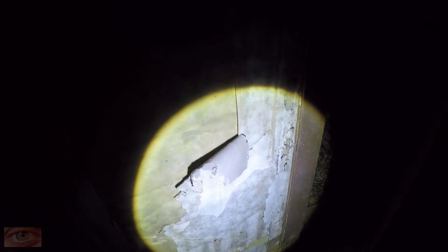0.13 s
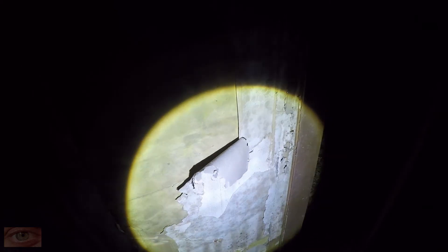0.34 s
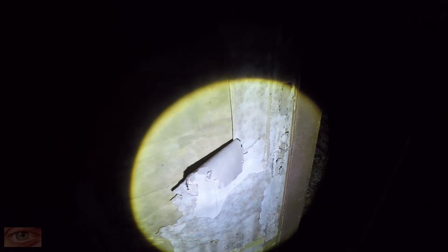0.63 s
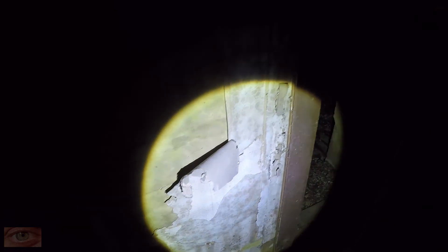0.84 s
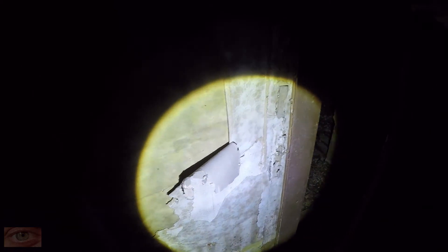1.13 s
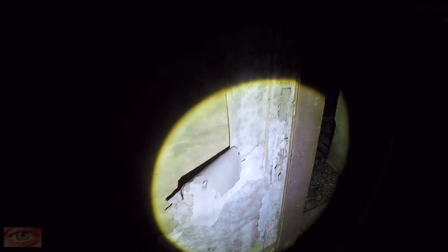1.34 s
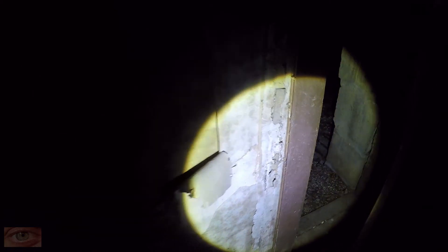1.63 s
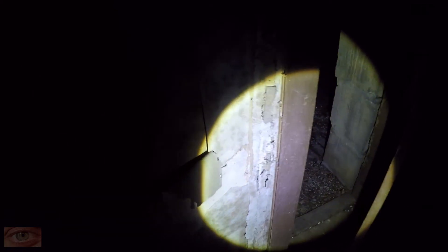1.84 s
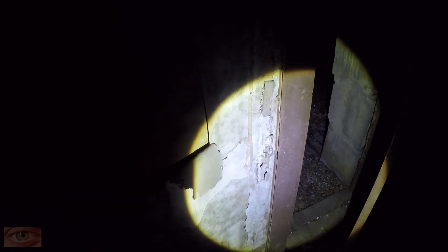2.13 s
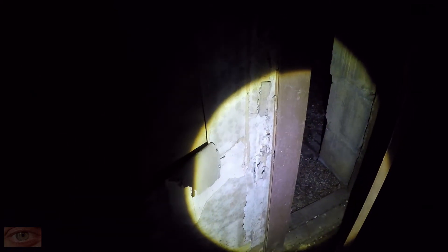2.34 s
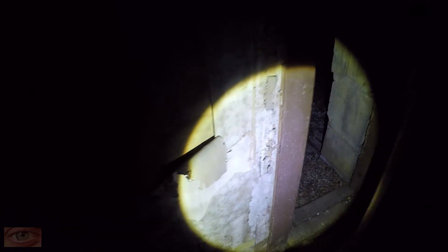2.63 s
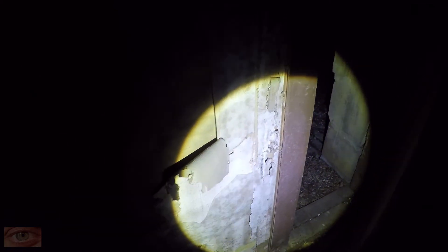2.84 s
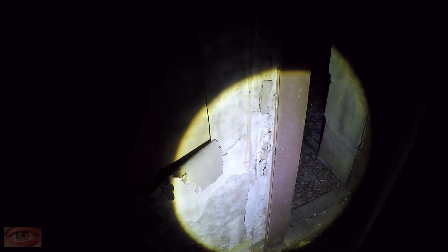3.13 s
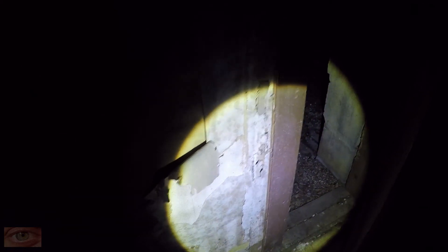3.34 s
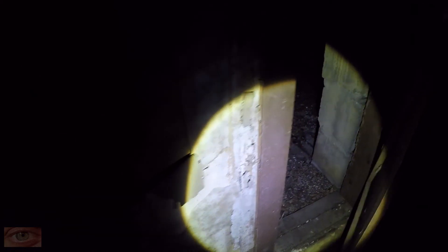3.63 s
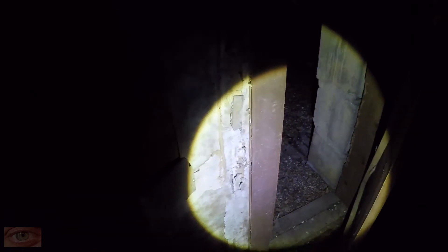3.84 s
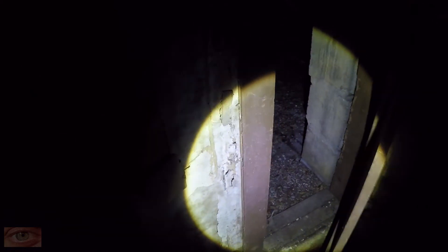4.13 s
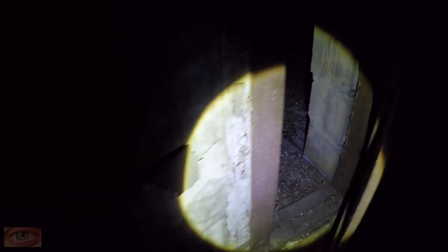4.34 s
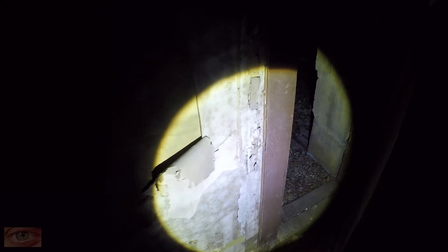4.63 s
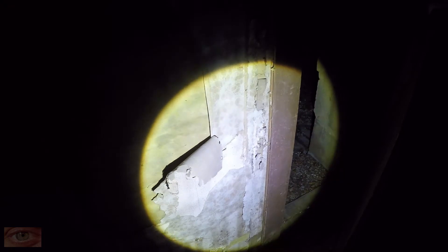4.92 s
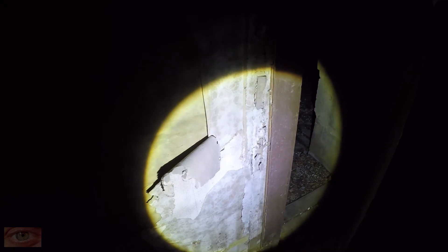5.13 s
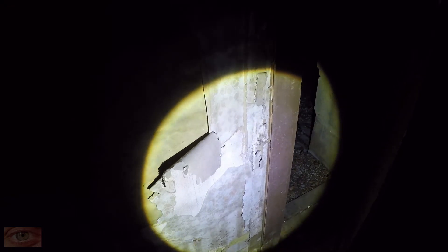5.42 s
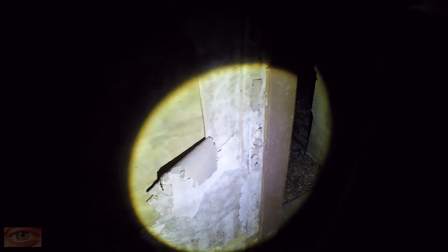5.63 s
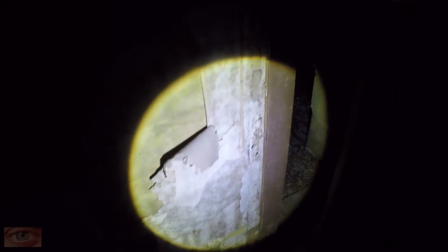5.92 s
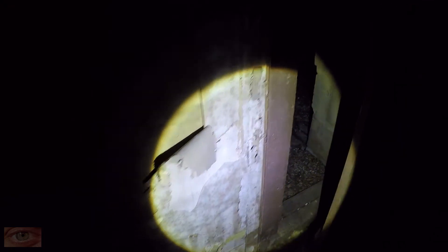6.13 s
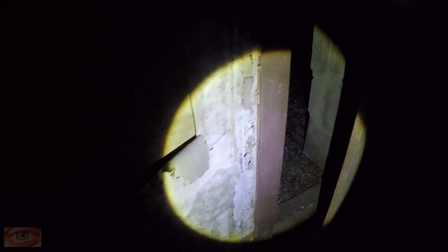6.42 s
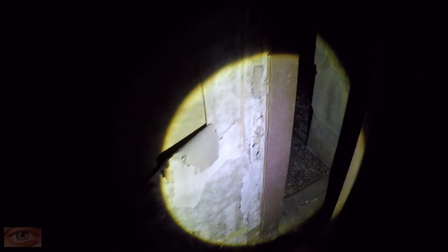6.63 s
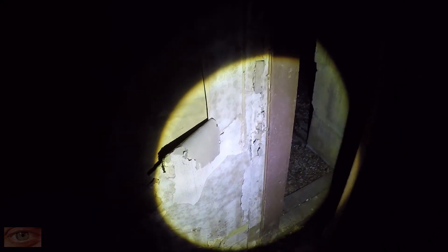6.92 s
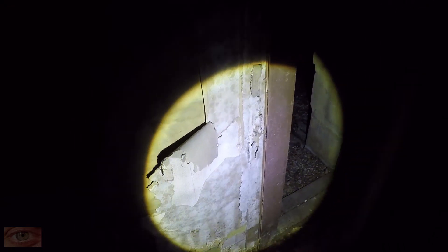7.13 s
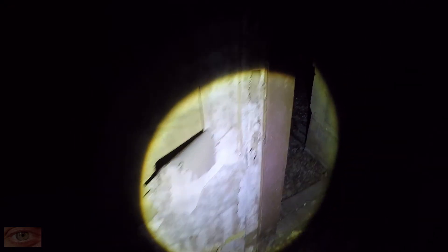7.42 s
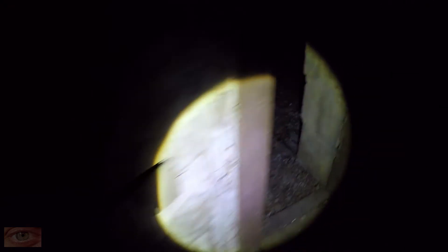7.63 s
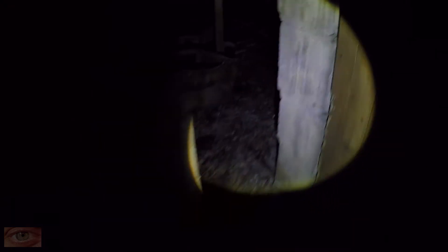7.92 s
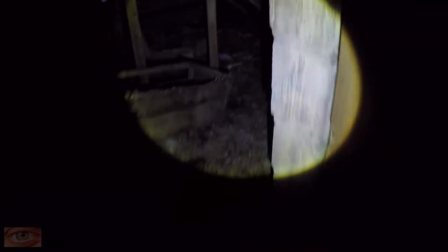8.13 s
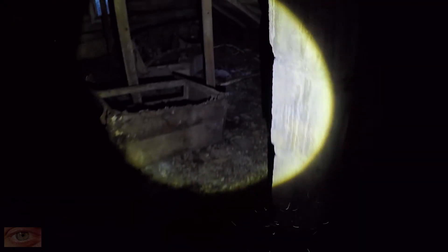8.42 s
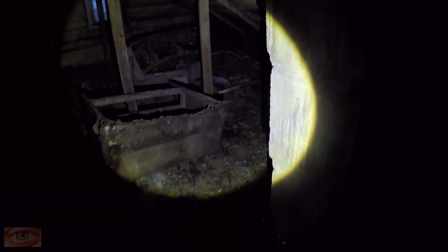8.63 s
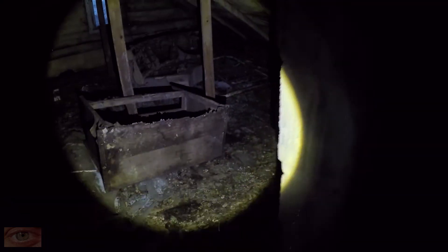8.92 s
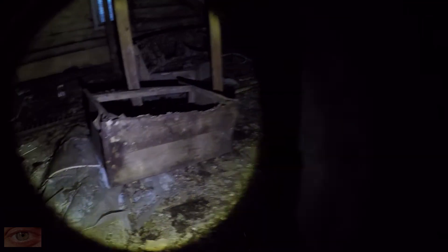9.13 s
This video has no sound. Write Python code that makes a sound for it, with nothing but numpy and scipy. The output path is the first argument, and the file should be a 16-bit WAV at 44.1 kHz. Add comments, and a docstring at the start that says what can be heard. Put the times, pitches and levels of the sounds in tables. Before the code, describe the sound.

In an empty house, a stuck wooden door is forced with repeated shoves and kicks. Each blow thumps low while the wood knocks against the frame, the loose handle rattles and the latch clinks. Between blows the bottom edge scrapes over gritty boards. The door breaks free near the end and a few fading footsteps follow. The close hand-held microphone picks up some low rumble and a short room echo.

```python
"""Forcing a swollen door

An empty house, a hand-held microphone close to a wooden door that is shoved, kicked and dragged open.
Each shove thumps the leaf and the floor, wood chatters against the frame, the loose latch clinks and the
bottom edge scrapes over grit. The door breaks free near the end and a few steps follow on the boards."""
import sys
import numpy as np
from scipy import signal
from scipy.fft import rfft, irfft
from scipy.io import wavfile
from scipy.ndimage import uniform_filter1d

SR = 44100
rng = np.random.default_rng(int(sys.argv[2]) if len(sys.argv) > 2 else 0)


def store_pcm(level_fs):
    """Save levels as 16-bit WAV."""
    pcm = np.round(np.clip(level_fs, -1, 1) * 32767).astype(np.int16)
    wavfile.write(sys.argv[1], SR, np.atleast_2d(pcm).T)


N = 409228
TIME = np.arange(N) / SR

# heavy blows on leaf and floor: (time [s], level [dB], pitch of the flexing wood [Hz])
HEAVY_BLOWS = [(0.48, -11, 166), (0.512, -5, 39), (.907, -9, 130), (1.001, -6, 101.4), (1.488, -10.5, 73),
               (2.351, -10, 85), (2.399, -11, 64.3), (2.436, -9, 94), (2.798, -6.5, 96.5), (2.85, -11, 68),
               (3.842, -27, 130), (3.899, -20, 67), (4.561, -2, 65.5), (4.95, -15, 96), (5.245, -3, 71),
               (5.46, -11.5, 80), (5.521, -10, 71.4), (5.649, -15, 76), (5.936, -18, 85.5),
               (6.272, -19, 172), (6.284, -15, 80), (6.462, -24, 73), (6.586, -4, 68), (6.62, -4, 37.7),
               (6.735, -7, 31.2), (7.805, -7, 88), (7.923, -11.5, 53), (8.232, -32, 48), (8.675, -30, 75),
               (9.213, -30, 51)]
# low resonances of door leaf and floorboards: (frequency [Hz], width [Hz], gain [dB])
LEAF_MODES = [(34.5, 3, 2.5), (61, 10, -6), (82.5, 9, -11), (104, 16, -7), (141, 24, -3), (185, 40, -3)]


def undb(db):
    """Decibels to gain."""
    return 10 ** (np.asarray(db) / 20)


def unit(x):
    """Scale to rms 1."""
    return x / np.sqrt(np.mean(x ** 2))


def add(track, start_s, sound):
    """Mix a sound into the track at start_s."""
    i = max(int(start_s * SR), 0)
    track[i:i + len(sound)] += sound[:N - i]


def fade(t, t60):
    """Gain of a ring that loses 60 dB in t60 seconds."""
    return np.exp(-np.log(1000) * t / t60)


def colour(x, spectrum, size=4096):
    """Causal filter through (Hz, dB) points, from the cepstrum of the log gain."""
    hz, db = np.transpose(spectrum)
    grid_hz = np.maximum(np.arange(size // 2 + 1) * SR / size, 1)
    gain = undb(np.interp(np.log(grid_hz), np.log(hz), db))
    cepstrum = irfft(np.log(gain))
    cepstrum[1:size // 2] *= 2
    cepstrum[size // 2 + 1:] = 0
    response = irfft(np.exp(rfft(cepstrum)))
    return signal.fftconvolve(x, response)[:len(x)]


def resonate(x, modes):
    """Sum of resonances given as (frequency [Hz], width [Hz], gain [dB])."""
    return sum(undb(db) * signal.lfilter(*signal.iirpeak(hz, hz / width, fs=SR), x)
               for hz, width, db in modes)


def wander(rate_hz):
    """Smooth random drift with a spread near 1."""
    hold = int(SR / rate_hz)
    return uniform_filter1d(rng.standard_normal(N)[np.arange(N) // hold], hold)


def contacts(spread_db):
    """Dense tiny impacts of very unequal size."""
    noise, size = rng.standard_normal((2, N))
    return unit(noise * undb(spread_db * size))


def efforts(gestures, attack_s, t60):
    """Gain of overlapping (start [s], end [s], level [dB]) gestures: each rises, holds and dies away."""
    power = 1e-18
    for start, end, db in gestures:
        rise = 1 - np.exp(-np.maximum(TIME - start, 0) / attack_s)
        release = fade(np.maximum(TIME - end, 0), t60)
        power = power + (undb(db) * rise * release) ** 2
    return np.sqrt(power)


def strike(hits, modes, push_s):
    """An object rings; where it is hit decides which modes answer, and a longer push softens the start."""
    out, t = np.zeros(N), TIME[:SR // 2]
    hz, mode_db, t60 = np.transpose(modes)
    envelopes = (1 - np.exp(-t / push_s)) * fade(t, t60[:, None])
    for start, db, centre_hz, spread_oct in hits:
        phase = rng.random((len(hz), 1))
        share = undb(mode_db) * np.exp(-.5 * (np.log2(hz / centre_hz) / spread_oct) ** 2) + 1e-18
        rings = envelopes * np.sin(2 * np.pi * (hz[:, None] * t + phase))
        add(out, start, undb(db) * (share / np.linalg.norm(share)) @ rings)
    return out


def house_hiss(level_db=-54):
    """The faint, nearly steady tone of the empty house."""
    # room tone: (frequency [Hz], level [dB])
    spectrum = [(59, -39), (100, 1.5), (218, -12), (438, -9.5), (564, -12.5), (843, -11), (977, -13.5),
                (1230, -13.5), (1520, -16), (5510, -25), (13900, -37.5), (15500, -38)]
    hiss = unit(colour(rng.standard_normal(N), spectrum))
    return hiss * undb(level_db + .27 * wander(rate_hz=13))


def microphone_rumble(still_db=-38.5):
    """Air and handling rumble on the microphone, swelling as the door swings."""
    # rumble: (frequency [Hz], level [dB])
    spectrum = [(8, -5.5), (20, 15), (34, 18), (48, 9.5), (70, 2.5), (140, -56)]
    # swells of air and handling: (start [s], end [s], level [dB])
    sways = [(.5, .78, -27), (1.0, 1.6, -27), (1.9, 2.0, -36), (2.4, 2.48, -13), (2.7, 3.95, -32),
             (4.55, 4.75, -17.5), (5.22, 5.3, -16), (5.51, 5.79, -20.5), (5.9, 6.15, -31),
             (6.59, 6.82, -23.5), (7.86, 7.98, -31.5)]
    rumble = unit(colour(rng.standard_normal(N), spectrum, size=16384))
    steady = rumble / np.sqrt(uniform_filter1d(rumble ** 2, size=6000))
    return steady * np.hypot(efforts(sways, attack_s=.017, t60=1), undb(still_db))


def room_echoes(x, build_s=.0046):
    """Diffuse echoes from bare walls, strongest in the lows."""
    # reverberation of the bare rooms: (low edge [Hz], high edge [Hz], t60 [s], level [dB])
    bands = [(50.4, 166, 0.56, -5), (207, 494, 0.3, -7), (755, 2200, 0.55, -26), (3000, 5000, 0.31, -52.5)]
    t, response = TIME[:SR], 0
    for low, high, t60, db in bands:
        bandpass = signal.butter(2, [low, high], "band", fs=SR, output="sos")
        noise = signal.sosfilt(bandpass, rng.standard_normal(SR))
        envelope = (1 - np.exp(-t / build_s)) * fade(t, t60)
        response = response + undb(db) * noise * envelope / np.linalg.norm(envelope)
    return signal.fftconvolve(x, response)[:N]


def footsteps():
    """Weight lands on a loose floorboard and sets it ringing."""
    # footfalls: (time [s], level [dB], centre of the excited modes [Hz], spread [octaves])
    footfalls = [(7.808, -13.5, 243, 0.56), (7.925, -22.5, 260, 0.5), (8.237, -18, 230, 1.24),
                 (8.675, -31, 223, 0.91), (8.712, -38, 250, 1.5), (9.060, -37.5, 119, 1.6),
                 (9.215, -31.5, 130, 0.67)]
    # loose floorboard: (frequency [Hz], level [dB], t60 [s])
    board_modes = [(61.4, 10.5, .8), (171, -4.5, .28), (249, -5, .26), (327, -3, .14), (398, -6, .2),
                   (650, 0, .1)]
    return strike(footfalls, board_modes, push_s=.00084)


def chips(start_s=2.58, end_s=2.97, loudest_db=-38, t60=.06, count=90):
    """Brittle chips shaken loose by the hardest shove crunch and tinkle, each at its own pitch."""
    out, t = np.zeros(N), TIME[:SR // 5]
    for when, pitch, size in rng.random((count, 3)):
        ping = np.sin(2 * np.pi * (4500 + 10000 * pitch) * t) * fade(t, t60)
        swell = np.sin(np.pi * when)  # the shower builds and thins out
        add(out, start_s + when * (end_s - start_s), swell * undb(loudest_db + 15 * (size - 1)) * ping)
    return out


def latch():
    """The loose iron latch clinks in short, high rings."""
    # clinks: (time [s], level [dB], centre of the excited modes [Hz], spread [octaves])
    clinks = [(1.006, -29, 7240, .046), (2.652, -33, 14300, 0.016), (2.658, -30, 6080, 0.067),
              (2.778, -21, 10700, .12), (2.806, -20, 13100, .02), (2.848, -7.5, 7000, 1.1),
              (2.965, -40, 4500, 0.63), (3.062, -39, 6980, 0.085), (5.628, -37, 6900, .1),
              (7.834, -32, 13100, 0.022), (8.194, -39, 3500, .3)]
    # iron latch: (frequency [Hz], level [dB], t60 [s])
    latch_modes = [(2875, -15, .17), (3246, -17, .16), (4011, -17, .08), (4635, -16, .12), (5453, 0, .11),
                   (5560, -9, .04), (5658, -13, .05), (6207, -20, .16), (6783, -1, .1), (7165, -26, .2),
                   (7730, -21, .09), (8510, -7, .07), (10309, -18, .1), (10730, -21, .14),
                   (11850, -17, .13), (13130, -20, .11), (13662, -1, .1), (13900, -19, .14),
                   (14900, -12, .07)]
    return strike(clinks, latch_modes, push_s=.00089)


def handle(spread_oct=.4):
    """Jolts rattle the loose handle."""
    # jolts: (time [s], level [dB], centre of the excited modes [Hz])
    jolts = [(1.003, -8, 3700), (2.396, -20, 2250), (3.092, -32.5, 3200), (4.272, -25, 2970),
             (4.3, -33, 2690), (4.57, -25, 1500), (4.738, -35.5, 1300), (4.941, -25, 1700),
             (4.957, -24, 3000), (5.053, -30.5, 1350), (5.25, -26.5, 1700), (5.305, -29.5, 2570),
             (5.454, -25.5, 1600), (5.523, -22, 3000), (5.626, -26, 2720), (6.29, -25.5, 4150),
             (6.692, -32.5, 1750), (7.888, -21, 1900), (7.968, -28, 2430)]
    # loose handle: (frequency [Hz], level [dB], t60 [s])
    handle_modes = [(1210, -3, 0.11), (1323, 1.5, 0.16), (1560, -13.5, .12), (1796, -14.5, 0.056),
                    (1785, -3, 0.086), (2120, -3, 0.14), (2344, -5, 0.12), (2630, -20.5, 0.073),
                    (2695, -8.5, .14), (2992, -2.5, 0.055), (3190, 0, 0.11), (3620, -1.5, 0.071),
                    (3860, -6.5, 0.082), (4340, -5, 0.1), (6850, -9, 0.14)]
    return strike([(*jolt, spread_oct) for jolt in jolts], handle_modes, push_s=.00034)


def scrape(rubbing, crushing):
    """The bottom edge catches and slips over the boards, crushing fine grit."""
    # wood rubbing on wood: (frequency [Hz], level [dB])
    rub_spectrum = [(150, -48), (250, -13.5), (312, -2), (523, -2), (561, -2.5), (853, -3.5), (1240, -4.5),
                    (1910, -7), (4300, -11), (7000, -26), (9100, -32.5), (15400, -120)]
    # grit under the edge: (frequency [Hz], level [dB])
    grit_spectrum = [(3000, -7), (5500, 4), (7500, -2.5), (10000, -6), (14000, -6), (15500, -17.5)]
    slips = undb(2.4 * wander(rate_hz=31) + 2.6 * wander(rate_hz=140))
    rub = unit(colour(contacts(spread_db=4.6) * slips, rub_spectrum)) * rubbing
    grit = unit(colour(contacts(spread_db=3.5) * slips, grit_spectrum)) * crushing
    return undb(-.3) * rub + undb(2) * grit


def catches(rubbing, count=60, above_rub_db=1, scatter_db=2.5, t60=.06):
    """Rows of small knocks: the edge catches at random, about as hard as it is rubbing just then."""
    rows = []
    for when, size, hardness in rng.random((count, 3)):
        db = 20 * np.log10(rubbing[int(when * N)]) + above_rub_db + scatter_db * (2 * size - 1)
        tilt, body_db = 4 * (2 * hardness - 1), db - 2
        rows.append((when * N / SR, db, tilt, body_db, t60))
    return rows


def shudder(rubbing, rub_gain_db=3, blow_gain_db=-23):
    """Friction keeps the whole leaf trembling, and it trembles on after each heavy blow."""
    # low drag on the leaf: (frequency [Hz], level [dB])
    spectrum = [(35, -17), (65, 4), (110, -4), (150, -11.5), (220, -18.5), (500, -62)]
    drag = colour(rng.standard_normal(N), spectrum)
    tremble = unit(undb(-5) * drag + resonate(drag, LEAF_MODES))
    aftershock = efforts([(start, start, db) for start, db, _ in HEAVY_BLOWS], attack_s=.015, t60=.8)
    return tremble * np.hypot(undb(rub_gain_db) * rubbing, undb(blow_gain_db) * aftershock)


def panel(spread_oct=.5, drum_db=-14.5, drum_hz=180):
    """The hollow panel rings under square blows, and its lowest modes drum along with every thump."""
    # blows square on the panel: (time [s], level [dB], centre of the excited modes [Hz])
    hits = [(.483, -20, 357), (.912, -11, 150), (1.004, -21, 368), (2.437, -14, 836), (2.59, -15, 630),
            (2.803, -14, 450), (2.835, -13, 174), (4.145, -33, 200), (5.456, -22, 664), (5.545, -24.5, 400),
            (5.938, -19, 320), (6.288, -17, 350), (6.588, -17.5, 490), (7.807, -9, 228),
            (7.892, -17.5, 430)]
    # door panel: (frequency [Hz], level [dB], t60 [s])
    panel_modes = [(139.4, 5, 0.34), (170.4, -2, 0.33), (190.8, 4, 0.24), (211.6, -7, 0.11),
                   (300.1, -5.5, 0.27), (325.6, -1.5, 0.14), (415.8, -6, 0.17), (441.4, -6.5, 0.15),
                   (526, -8.5, 0.16), (565, -2.5, 0.11), (644, -5.5, 0.3), (787, -4, 0.26),
                   (866, 1.5, 0.14), (1110, -19.5, 0.5), (1263, 3.5, 0.26), (1490, 9.5, .2)]
    square = [(*hit, spread_oct) for hit in hits]
    drummed = [(start, db + drum_db, drum_hz, spread_oct) for start, db, _ in HEAVY_BLOWS]
    return strike(square + drummed, panel_modes, push_s=.0021)


def thumps():
    """The wood flexes for a few cycles under each blow and sets leaf and floor booming."""
    flex, t = np.zeros(N), TIME[:SR // 2]
    for start, db, hz in HEAVY_BLOWS:
        swell_s = min(.004 - .00035 * db, .008)  # weaker blows build more slowly, up to a limit
        age = t / swell_s
        add(flex, start, undb(db) * age * np.exp(1 - age) * np.sin(2 * np.pi * hz * t))
    return undb(-2.5) * flex + undb(3.5) * resonate(flex, LEAF_MODES)


def planks(contact):
    """The boards pass on each contact through a few strong resonances and a thicket of short weak ones."""
    # planks and frame: (frequency [Hz], width [Hz], gain [dB])
    plank_modes = [(331.7, 32, 5), (417, 29, -3), (566, 64, -0.5), (859, 20, -2.5), (1127, 25, -5),
                   (1345, 59, -0.5), (1545, 13, -9.5), (2170, 29, -16.5), (2317, 76, -4.5),
                   (2890, 110, -3.5), (3340, 37, -10), (3496, 34, -3.5), (4080, 130, 3.5), (4740, 130, 1)]
    t = TIME[:SR // 8]
    thicket = rng.standard_normal(len(t)) * fade(t, t60=.055)
    dense = signal.fftconvolve(contact, thicket / np.linalg.norm(thicket))[:N]
    return undb(-3) * contact + undb(-2) * resonate(contact, plank_modes) + undb(-9) * dense


def knocks(edge_catches, rise_s=.0011):
    """Rough faces meet in a dying burst of contacts: a hollow note, a clack, a crack and splintering."""
    # wood on wood, from the first shove to shoes on the boards:
    # (time [s], level [dB], hardness as treble tilt [dB/octave], hollow body [dB], chatter t60 [s])
    door_knocks = [ (.479, -21.5, 1.5, -21.5, .24), (0.903, -32, 1, -20, .11), (0.942, -30.5, 1, -24, 0.31),
                   (1.0, -6.5, 4.5, -10, 0.11), (1.392, -37, 0, -40, .2), (1.432, -27, 5, -33.5, 0.19),
                   (1.466, -25.5, 5, -31, 0.18), (1.496, -27, 0, -27.5, 0.086), (2.349, -23, -3, -21, .21),
                   (2.394, -11, -1.5, -11, 0.083), (2.434, -7, -4, -5, .105), (2.571, -28, -4, -30, .1),
                   (2.587, -35.5, -3, -28, .12), (2.613, -14, 0.5, -23, .11),
                   (2.765, -21.5, 9.5, -26, 0.21), (2.792, -14, 1, -17.5, 0.3), (2.803, -12, 12, -13, 0.13),
                   (2.825, -18, 1, -14, .12), (2.848, -10.5, 8.5, -12, 0.033), (2.884, -28, 2, -18, .15),
                   (3.019, -30, 3, -37, .1), (3.047, -19, 5, -29, 0.07), (3.196, -49.5, -14, -34, 0.085),
                   (3.731, -52, -19, -40, .3), (3.842, -41.5, -4.5, -28.5, 0.39),
                   (3.893, -25, 2.5, -33, .14), (4.142, -38.5, 0, -29.5, .16), (4.271, -31, 5, -44, .08),
                   (4.379, -32, 0.5, -44, 0.11), (4.565, -26, -1.5, -23, .17), (4.74, -41, 2, -40, .25),
                   (4.939, -27, -1.5, -31, .11), (4.953, -27, -4, -24, .12), (5.05, -30.5, 4.5, -45, 0.19),
                   (5.151, -36, 1, -45, .12), (5.214, -34, -8.5, -17.5, 0.063), (5.246, -28, -2, -22, .15),
                   (5.269, -30, 0, -34, .18), (5.366, -35, 4, -41, .09), (5.419, -35, 8, -36, .1),
                   (5.451, -19, -5, -16.5, 0.072), (5.52, -25, 3.5, -21, 0.097), (5.543, -27, 0, -26, .2),
                   (5.623, -22.5, 6.5, -36, 0.14), (5.931, -37, -5, -23, 0.15),
                   (5.964, -32, 1.5, -32.5, 0.2), (5.996, -34, -2, -42, .1), (6.272, -30.5, 2, -22, 0.11),
                   (6.288, -24, 4, -26, 0.11), (6.463, -50, -8, -28, .1), (6.546, -37, -3, -42, .18),
                   (6.584, -25, -1.5, -10.5, 0.14), (6.623, -30.5, -1, -25, 0.35),
                   (6.69, -28.5, -1, -27, .09), (6.72, -50, -6, -22, .13), (7.26, -39, -8.5, -49, .06),
                   (7.804, -26, 1, -13, .1), (7.818, -15.5, 7, -29, .1), (7.856, -20, 2, -22, 0.16),
                   (7.887, -14.5, 3, -17.5, 0.13), (7.951, -26.5, -1.5, -26, 0.14),
                   (8.049, -45, -5, -37, .08), (8.193, -43, 10, -53, .1), (8.235, -46, -8.5, -16, 0.11),
                   (8.672, -51.5, -7.5, -41.5, 0.17), (9.213, -40.5, -7, -59, 0.06)]
    # the five voices of a knock, low to high, each (frequency [Hz], level [dB])
    body_spectrum = [(90, -44.5), (190, 1), (300, -3), (450, -2.5), (650, -3), (850, -16.5), (1300, -38.5),
                     (3000, -73.5)]
    clack_spectrum = [(350, -43.5), (700, -4.5), (950, -2.5), (1500, -4.5), (1900, -6), (2800, -38.5)]
    crack_spectrum = [(1000, -61.5), (1700, 6.5), (2100, 9), (3400, 7), (4500, -10.5), (6000, -8),
                      (11000, -43)]
    splinter_spectrum = [(2500, -18), (4300, 6), (5200, 5), (6500, -3), (8000, -7), (11000, -23),
                         (15000, -36)]
    snap_spectrum = [(5000, -45), (8000, 4.5), (11000, 3.5), (15000, -7)]
    starts, crack_db, tilt, body_db, t60s = np.transpose(door_knocks + edge_catches)
    clack_db, splinter_db = crack_db - tilt, crack_db + tilt  # an octave below and above the crack
    snap_db = 1.51 * splinter_db  # only the hardest blows snap fibres and reach the top octave
    voices = [(body_spectrum, body_db - 6), (clack_spectrum, clack_db - 2.7),
              (crack_spectrum, crack_db - 4), (splinter_spectrum, splinter_db - 14),
              (snap_spectrum, snap_db - 20)]
    out, t = np.zeros(N), TIME[:SR // 3]
    for spectrum, levels in voices:
        chatter = unit(colour(contacts(spread_db=5.9), spectrum))
        steady = chatter / np.sqrt(uniform_filter1d(chatter ** 2, size=900))
        power = np.zeros(N)
        for start, db, t60 in zip(starts, levels, t60s):
            force = undb(db) * (1 - np.exp(-t / rise_s)) * fade(t, t60)
            add(power, start, force ** 2)
        out += steady * np.sqrt(power)
    return out


def scene():
    """Door and footsteps close up, in mono, with the bare room answering behind them."""
    # drags of the bottom edge: (start [s], end [s], wood rubbing [dB], grit hissing [dB])
    drags = [(0, .08, -54, -80), (0.526, 1.028, -36, -50), (1.096, 1.45, -49, -56.5),
             (1.55, 2.014, -59.5, -78), (2.006, 2.38, -50, -57.5), (2.42, 2.98, -36, -53),
             (3.638, 4.007, -48.5, -60.5), (4.01, 4.163, -42.5, -53), (4.4, 5.113, -50, -65),
             (5.104, 5.68, -43, -60), (5.87, 6.053, -48, -66), (6.056, 6.335, -45.5, -59),
             (6.48, 7.207, -55.5, -67), (7.227, 8.01, -53, -65), (8.944, 9.276, -62.5, -81)]
    rubbing = efforts([(start, end, db) for start, end, db, _ in drags], attack_s=.03, t60=.65)
    crushing = efforts([(start, end, db) for start, end, _, db in drags], attack_s=.03, t60=.65)
    wood = planks(knocks(catches(rubbing))) + panel()
    edge = scrape(rubbing, crushing)
    clatter = handle() + latch() + chips()
    boom = thumps() + shudder(rubbing) + footsteps()
    direct = wood + edge + clatter + boom
    return (direct + room_echoes(direct) + microphone_rumble() + house_hiss())[None]


def record(dry, top_hz=15550):
    """The hand-held recorder rounds the loudest peaks and cuts the top."""
    rounded = dry / (1 + dry ** 6) ** (1 / 6)
    lowpass = signal.ellip(10, .2, 80, top_hz, fs=SR, output="sos")
    return signal.sosfilt(lowpass, rounded)


dry = scene()
out = record(dry)
store_pcm(out)
```